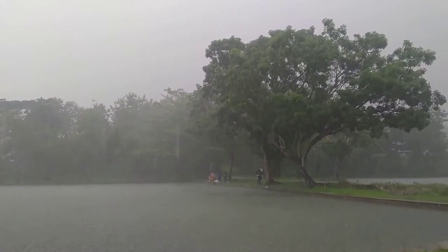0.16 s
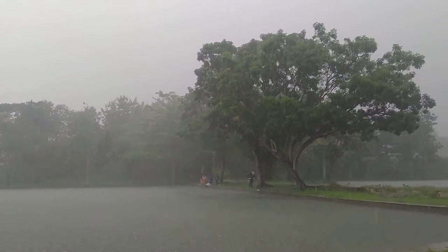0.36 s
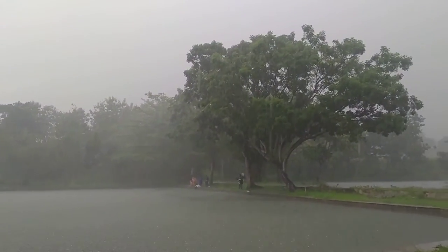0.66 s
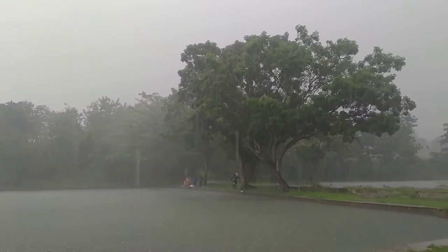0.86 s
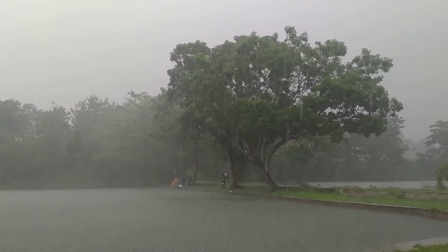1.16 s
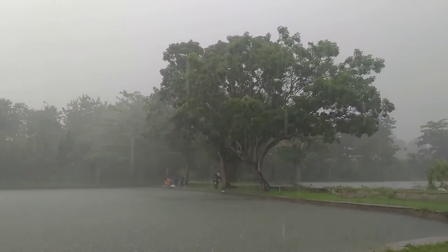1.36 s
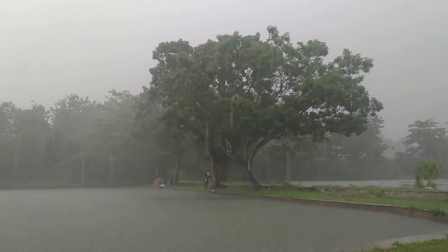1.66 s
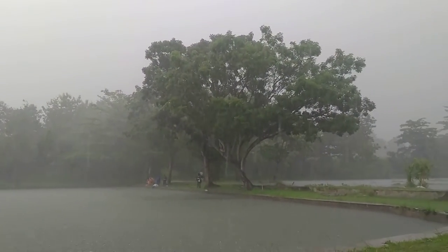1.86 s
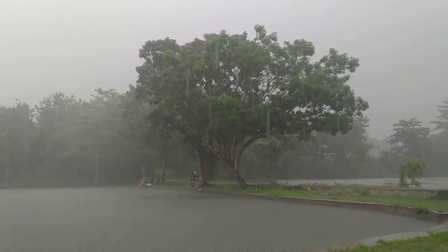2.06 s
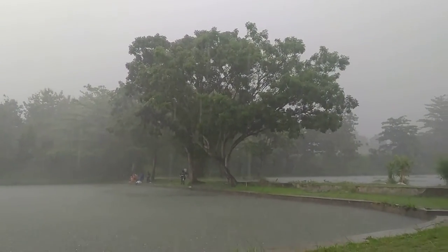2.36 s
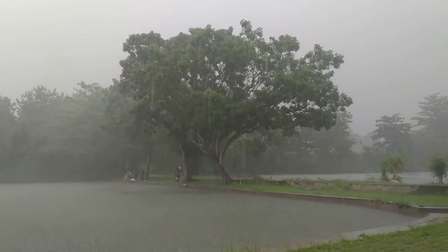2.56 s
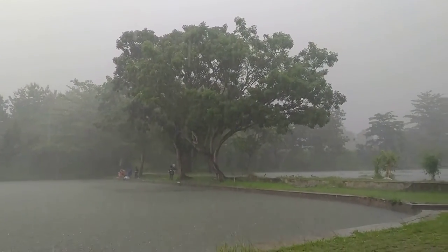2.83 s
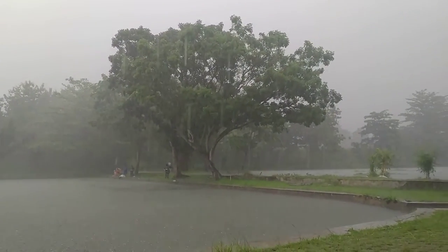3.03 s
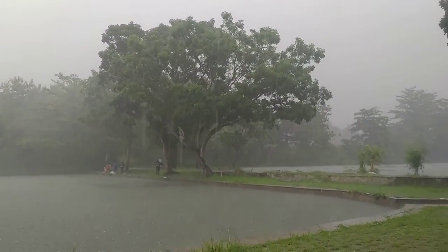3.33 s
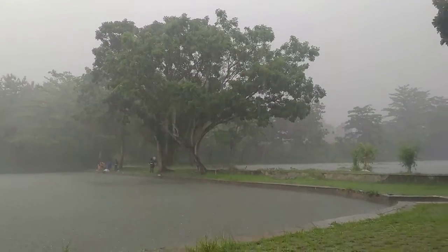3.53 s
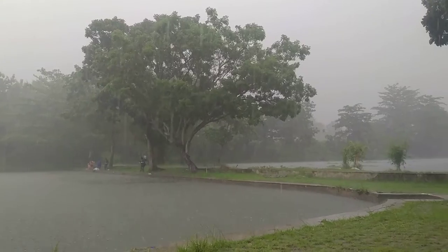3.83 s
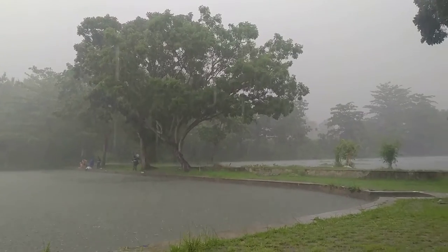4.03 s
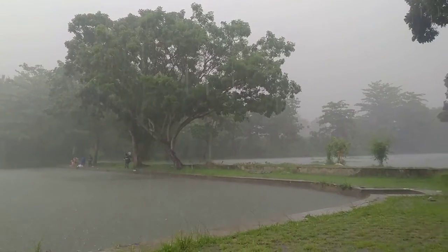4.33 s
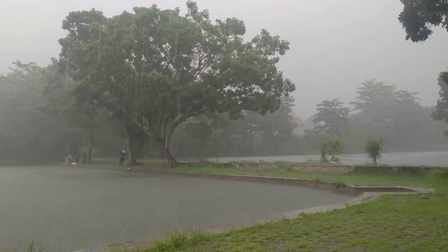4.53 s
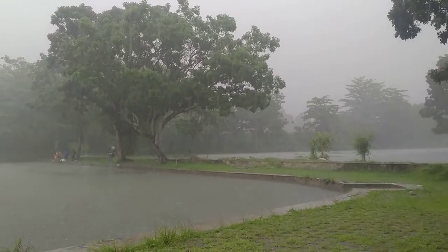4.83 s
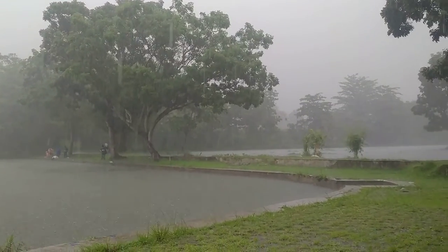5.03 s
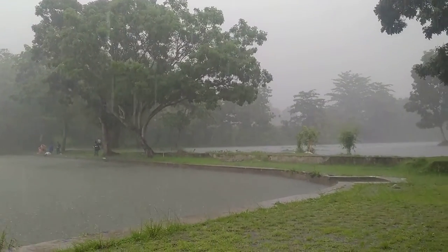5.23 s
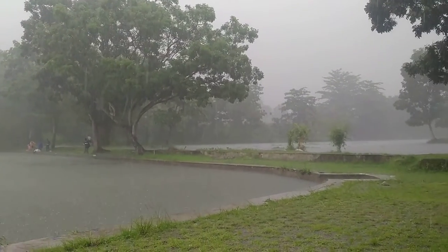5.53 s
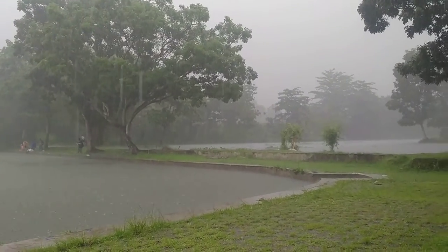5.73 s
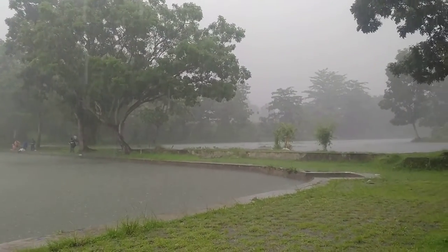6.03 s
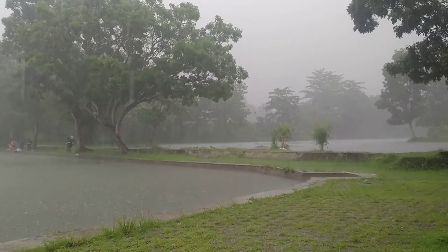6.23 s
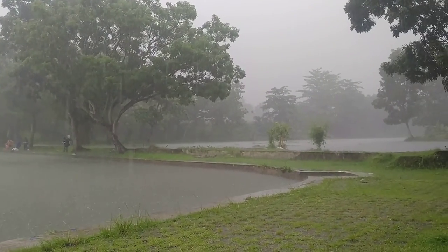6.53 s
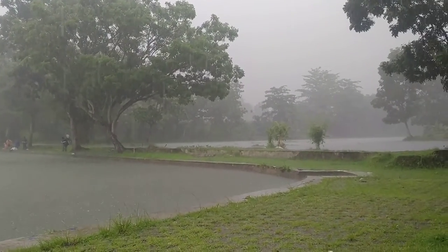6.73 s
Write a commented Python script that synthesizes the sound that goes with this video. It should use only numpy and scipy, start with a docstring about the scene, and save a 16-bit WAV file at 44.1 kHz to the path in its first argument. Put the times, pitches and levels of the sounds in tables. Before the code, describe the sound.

Heavy rain falls steadily on a pond and grass, an even hiss of pattering, bubbling drops with a few close ticks.

```python
"""Heavy rain falls on a pond and a lawn, heard from the bank through one small microphone.
Near drops patter, throw up hissing spray and trap air bubbles that ring in the water.
A few land close by as sharp ticks and dull plops; far ones blur into a wash over a low rumble.
The rain comes down harder in short surges; the bubbling slowly grows while the finest fizz fades."""
import sys
import numpy as np
from scipy import signal
from scipy.fft import rfft, irfft
from scipy.io import wavfile

SR = 44100
rng = np.random.default_rng(int(sys.argv[2]) if len(sys.argv) > 2 else 0)


def int16_out(signal):
    """Quantize to a 16-bit WAV file."""
    q = np.round(np.clip(np.atleast_2d(signal).T, -1, 1) * 32767)
    wavfile.write(sys.argv[1], SR, q.astype(np.int16))


N = 303834
TIME = np.arange(N) / SR

# A tone colour says how strong each frequency is compared with the others.
# Colour of the far rumble: frequency_hz, level_db
RUMBLE_COLOUR = [(26, -52), (45, -37), (89, -1), (114, 4), (233, 2.5), (330, -1), (430, -25.5), (730, -120)]
# Colour of the finest droplets: frequency_hz, level_db
FIZZ_COLOUR = [(5000, -32), (8500, -7), (10500, -0.2), (12000, 0.7), (13400, -3), (14600, 0.5), (15700, 4)]
# Colour of the hissing spray: frequency_hz, level_db
SPRAY_COLOUR = [(2900, -38), (5000, -9.5), (5600, -5.5), (6400, -3.5), (7200, -2), (8400, 2), (9000, -2.5),
                (9800, -9), (11000, -14), (15000, -41)]
# Colour of a close drop's click: frequency_hz, level_db
TICK_COLOUR = [(1500, -25), (6000, -10), (8650, 1), (10200, -5), (13000, -5), (15500, -1)]
# Colour of the bubbling water: frequency_hz, level_db
POND_COLOUR = [(700, -45.5), (1550, -9), (1880, 0), (2400, -1.5), (2750, -1.5), (3200, -8.5), (5000, -36.5),
               (9000, -70)]
# Colour of drops slapping water and grass: frequency_hz, level_db
PATTER_COLOUR = [(190, -39.5), (330, -9), (480, -3.5), (750, -3), (1000, -1), (1500, -0.5), (2200, -1.5),
                 (3000, -6.5), (3800, -13.5), (5000, -22.5), (6500, -47.5), (11000, -87)]
# Drops that land next to the microphone: start_s, relative_level_db
CLOSE_DROPS = [(0.385, -30), (0.4628, -34), (0.7352, -33), (1.049, -32), (1.914, -30), (2.4927, -33),
               (3.3752, -33), (3.3992, -37), (3.6157, -37), (4.2323, -32), (4.3041, -31), (4.9282, -29),
               (5.1547, -35), (5.6087, -36), (6.1514, -31), (6.2322, -28)]
# Fat drops that plop into the water: start_s, level_db, pitch_hz
FAT_DROPS = [(1.251, -23, 546), (3.983, -17, 880), (4.917, -30, 501), (5.474, -28, 1110), (5.758, -26, 953)]
# How much of the pond's sound is one ringing band as the microphone turns: time_s, power_share (0-1)
RINGING_SHARE = [(0, 0.22), (5.1, 0.16), (5.4, 0.6), (6.8, 0.3)]
# Spells of harder rain: start_s, hold_s, relative_strength_db
RAIN_SURGES = [(1.15, 0.78, 1.1), (4.117, 0.11, 0.9), (5.18, 0.56, 1.57), (6.547, 0.15, 2)]


def gain_of(db):
    """Turns decibels into a number to multiply a sound by."""
    return 10 ** (np.asarray(db) / 20)


def evened(x):
    """Scales a signal to an average strength (rms) of 1."""
    return x / np.sqrt(np.mean(x ** 2) + 1e-20)


def add(mix, start_s, sound):
    """Mixes a sound in at the given time."""
    part = mix[max(round(start_s * SR), 0):][:len(sound)]
    part += sound[:len(part)]


def click_of(colour, size=4096):
    """The shortest click that has this tone colour."""
    points_hz, points_db = np.transpose(colour)
    hz = abs(np.fft.fftfreq(size, 1 / SR))
    db = np.interp(np.log(hz + 1), np.log(points_hz + 1), points_db)
    log_gain = np.log(gain_of(np.maximum(db, -90)))
    spectrum = np.exp(np.conj(signal.hilbert(log_gain)))  # packs the energy at the start
    return np.fft.ifft(spectrum).real[:size // 2]


def coloured(x, colour):
    """Gives a sound this tone colour, at strength 1."""
    return evened(signal.oaconvolve(x, click_of(colour))[:N])


def waver(low_hz, high_hz):
    """A random wobble, mostly between two rates."""
    hz = np.fft.rfftfreq(N, 1 / SR)
    shape = hz / (hz ** 2 + low_hz ** 2) ** (3 / 4) / np.sqrt(1 + (hz / high_hz) ** 4)
    return evened(irfft(rfft(rng.standard_normal(N)) * shape, N))


def drops(per_s, spread_db):
    """Drops hit at random moments: many small, a few large."""
    size = gain_of(spread_db * np.minimum(rng.exponential(1, N), 4))
    sign = rng.choice([-1, 1], N)
    lands = rng.random(N) < per_s / SR
    return evened(size * sign * lands)


def smear(hits, decay_s, kinds=8):
    """Smears each hit into a very brief burst of noise, softening its click."""
    t = np.arange(SR // 100) / SR
    out, kind = np.zeros(N), rng.integers(0, kinds, N)
    for k in range(kinds):
        burst = rng.standard_normal(len(t)) * t * np.exp(-t / decay_s)
        phase = np.angle(rfft(burst, 2 * len(t)))
        even_burst = irfft(np.exp(1j * phase))[:len(t)]  # all frequencies equally strong
        out += signal.oaconvolve(hits * (kind == k), even_burst)[:N]
    return evened(out)


def wash(patch_db, patch_s, patch_hz, size=512):
    """Countless far drops: noise that swells in small patches of time and pitch."""
    hz, t, noise = signal.stft(rng.standard_normal(N), SR, nperseg=size)
    across, along = np.fft.fftfreq(len(hz), hz[1])[:, None], np.fft.fftfreq(len(t), t[1])
    blur = np.exp(-(across * patch_hz) ** 2 - (along * patch_s) ** 2)
    speckles = rng.standard_normal(noise.shape)
    patches = evened(np.fft.ifft2(np.fft.fft2(speckles) * blur).real)
    _, sound = signal.istft(noise * gain_of(patch_db * patches), SR, nperseg=size)
    return evened(sound[:N])


def bubbles(low_hz, high_hz, per_s, cycles, rise, pitches=14):
    """Trapped air rings for a few cycles, rising in pitch as it nears the surface."""
    out, t = np.zeros(N), np.arange(SR // 25) / SR
    for hz in np.geomspace(low_hz, high_hz, pitches):
        age = t * hz / cycles
        ring = np.exp(-age) * np.sin(2 * np.pi * hz * t * (1 + rise * np.minimum(age, 4)))
        hits = drops(per_s / pitches, spread_db=2.5)
        out += evened(signal.oaconvolve(hits, ring)[:N])
    return evened(out)


def surges(gust_db=0.07, rise_s=0.09, fall_s=0.12):
    """How much harder than usual it rains: surges build, hold and fade over slight gusts."""
    db = gust_db * waver(low_hz=1.5, high_hz=6)
    for start_s, hold_s, strength_db in RAIN_SURGES:
        age = TIME - start_s
        build = np.clip(age / rise_s, 0, 1)
        fade = np.exp(-np.maximum(age - hold_s, 0) / fall_s)
        db += strength_db * build * fade
    return db


def loudness(surge, base_db, drift_db_per_s, follow):
    """A layer's volume drifts slowly up or down and follows the surges."""
    return gain_of(base_db + drift_db_per_s * TIME + follow * surge)


def rumble():
    """Only the bass of the downpour arrives from far across the water."""
    return coloured(rng.standard_normal(N), RUMBLE_COLOUR)


def fizz(impacts):
    """The finest droplets fizz as they are thrown up from the grass."""
    far = wash(patch_db=1.7, patch_s=0.02, patch_hz=1500)
    fine_hits = smear(drops(per_s=700, spread_db=5), decay_s=0.0004, kinds=6)
    return coloured(far + gain_of(-10) * (impacts + fine_hits), FIZZ_COLOUR)


def spray(impacts):
    """Splashing drops make a high hiss, along with tiny bubbles."""
    far = wash(patch_db=1, patch_s=0.016, patch_hz=1500)
    tiny = bubbles(low_hz=5060, high_hz=9440, per_s=640, cycles=4.5, rise=0.02, pitches=8)
    return coloured(far + gain_of(-10.5) * (impacts + tiny), SPRAY_COLOUR)


def ticks(boost_db=8):
    """Every close drop makes the same hard, bright click."""
    out, click = np.zeros(N), click_of(TICK_COLOUR)
    for start_s, level_db in CLOSE_DROPS:
        add(out, start_s, gain_of(level_db + boost_db) * click / abs(click).max())
    return out


def plops(swell_s=0.00083):
    """A fat drop opens a hollow in the water that rings low and briefly."""
    out, t = np.zeros(N), np.arange(SR // 20) / SR
    swell_and_fade = t / swell_s * np.exp(1 - t / swell_s)
    for start_s, level_db, pitch_hz in FAT_DROPS:
        add(out, start_s, gain_of(level_db) * np.sin(2 * np.pi * pitch_hz * t) * swell_and_fade)
    return out


def pond(impacts, ring_hz=2430, ring_sharpness=3.6):
    """The open water seethes: far bubbles blur together, near ones ring one by one."""
    far = wash(patch_db=1.5, patch_s=0.038, patch_hz=700)
    blurred = coloured(far + gain_of(-7.5) * impacts, POND_COLOUR)
    near = bubbles(low_hz=1670, high_hz=3057, per_s=900, cycles=7.2, rise=0.012)
    wide = evened(blurred + gain_of(-3) * near)
    band = signal.iirpeak(ring_hz, ring_sharpness, SR)
    hits = drops(per_s=3000, spread_db=3.5)
    ringing = evened(signal.lfilter(*band, signal.lfilter(*band, hits)))
    share = np.interp(TIME, *np.transpose(RINGING_SHARE))
    return np.sqrt(1 - share) * wide + np.sqrt(share) * ringing


def patter(impacts):
    """Drops slap the water and the grass in front of a steady far wash."""
    far = rng.standard_normal(N)
    return coloured(far + gain_of(-2) * impacts, PATTER_COLOUR)


def scene():
    """The rain arrives in quick flurries and longer surges, with single ticks and plops on top."""
    flurry = waver(low_hz=11, high_hz=66)
    impacts = smear(drops(per_s=2200, spread_db=3.5), decay_s=0.0002) * gain_of(flurry)
    surge = surges()
    far = rumble() * loudness(surge, base_db=-45, drift_db_per_s=0.11, follow=1)
    rain = fizz(impacts) * loudness(surge, base_db=-48, drift_db_per_s=-0.27, follow=0.85)
    rain += spray(impacts) * loudness(surge, base_db=-44.5, drift_db_per_s=0.02, follow=0.72)
    rain += pond(impacts) * loudness(surge, base_db=-31.5, drift_db_per_s=0.13, follow=1.17)
    rain += patter(impacts) * loudness(surge, base_db=-30, drift_db_per_s=0.01, follow=0.63)
    return (far + rain * gain_of(0.15 * flurry) + ticks() + plops())[None]


def record(dry):
    """The microphone loses deep bass, a thin slice of treble and the very top; the sound then stops."""
    bass_hz, top_hz, stop_s = 64, 15750, 6.834
    notch_hz, notch_sharpness, notch_depth = 7910, 45, 0.7
    sound = signal.sosfilt(signal.butter(3, bass_hz, "high", fs=SR, output="sos"), dry)
    notched = signal.lfilter(*signal.iirnotch(notch_hz, notch_sharpness, SR), sound)
    sound += notch_depth * (notched - sound)
    top_cut = signal.firwin(1023, top_hz, window=("kaiser", 9), fs=SR)
    return signal.oaconvolve(sound * (TIME < stop_s), top_cut[None], "same")


dry = scene()
out = record(dry)
int16_out(out)
```